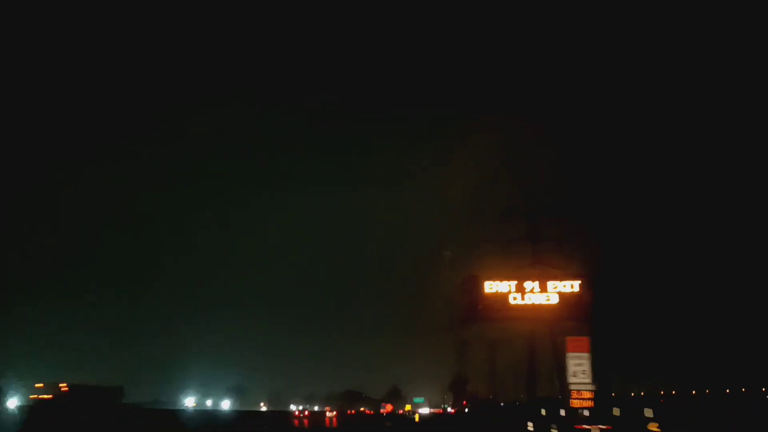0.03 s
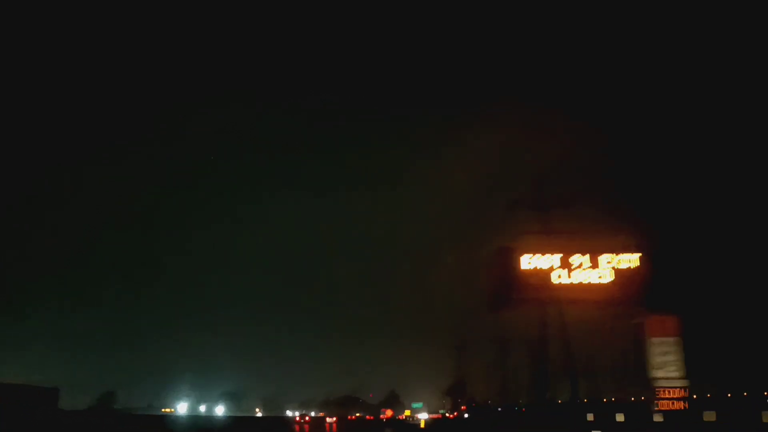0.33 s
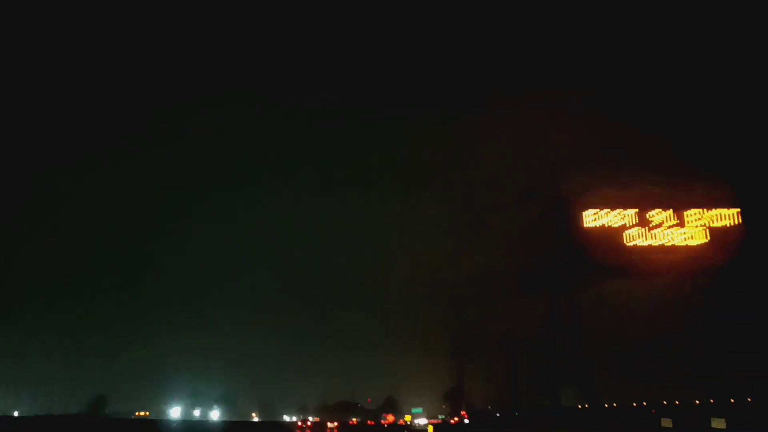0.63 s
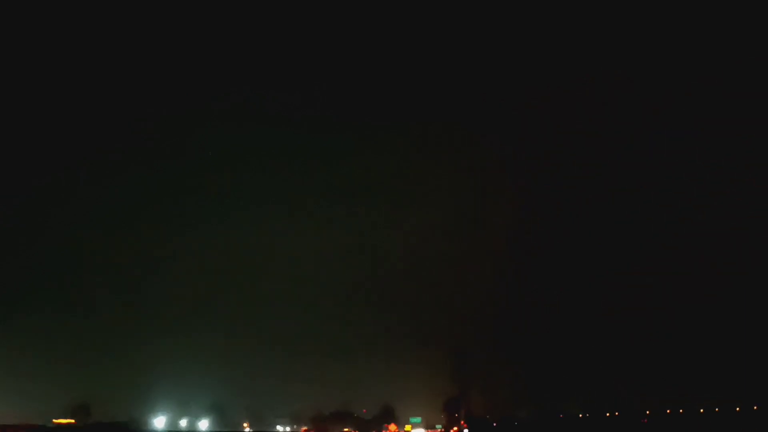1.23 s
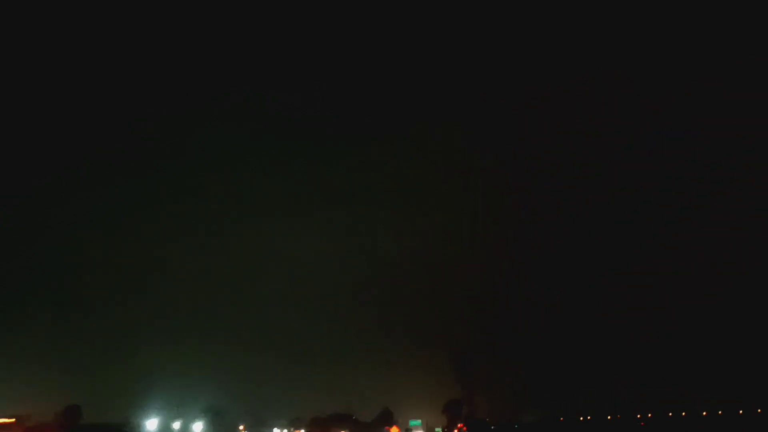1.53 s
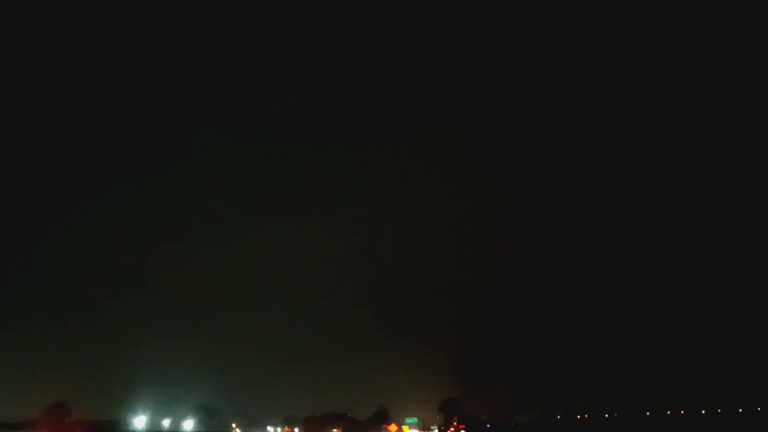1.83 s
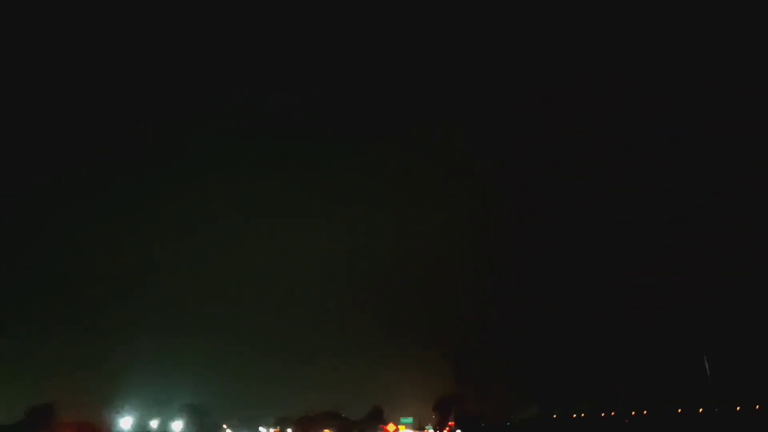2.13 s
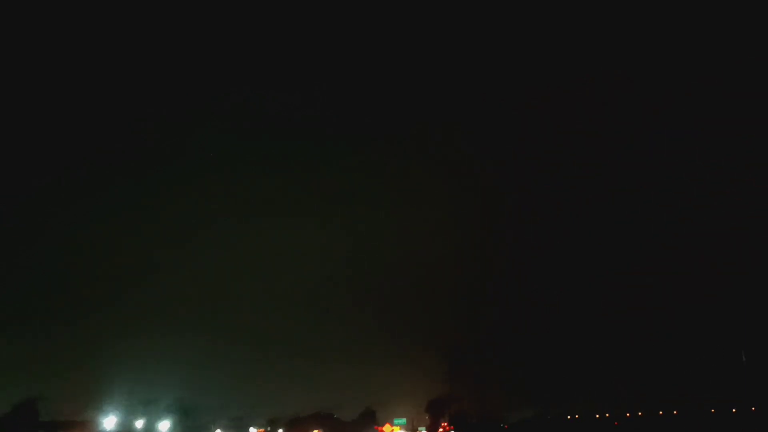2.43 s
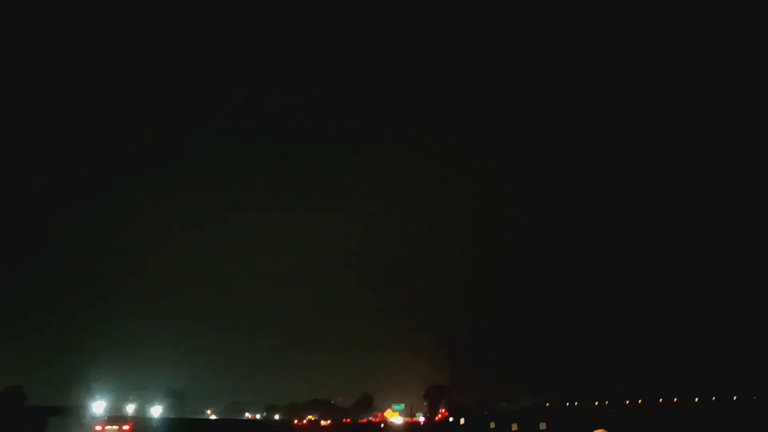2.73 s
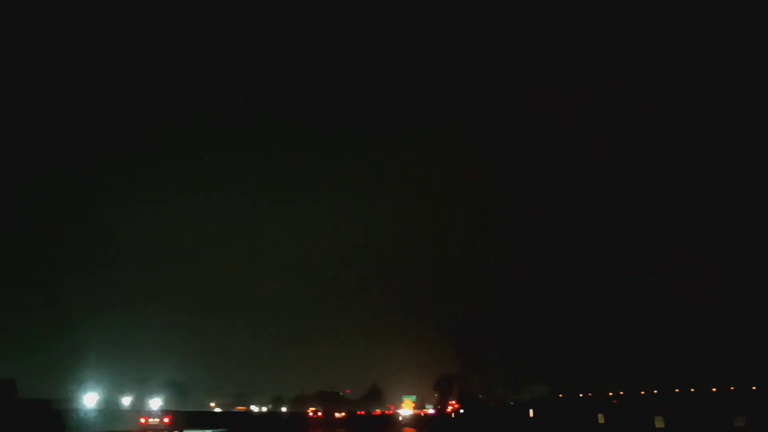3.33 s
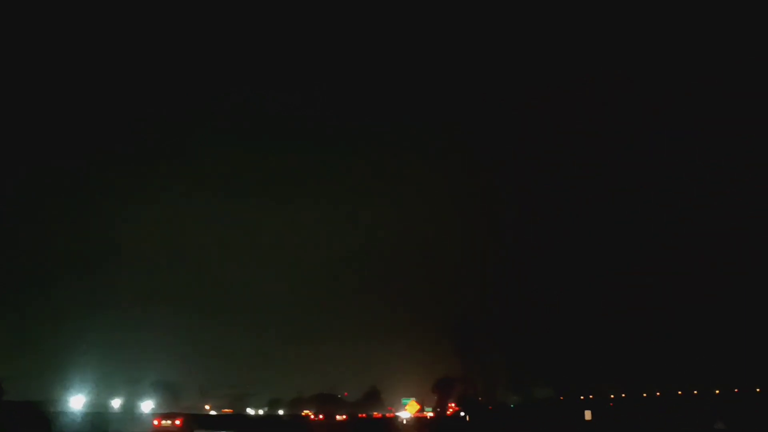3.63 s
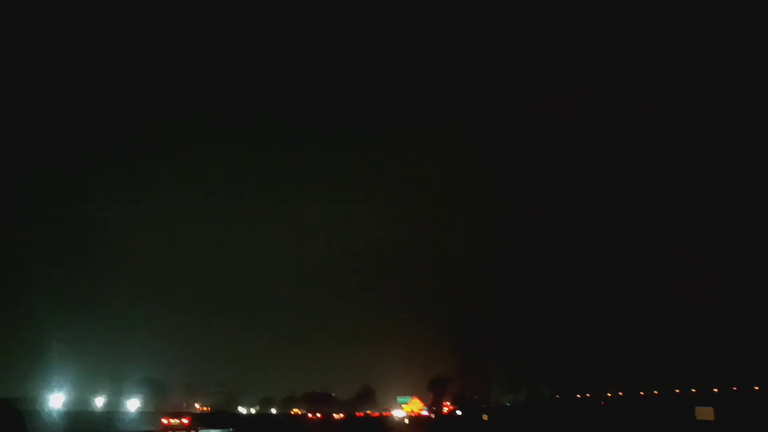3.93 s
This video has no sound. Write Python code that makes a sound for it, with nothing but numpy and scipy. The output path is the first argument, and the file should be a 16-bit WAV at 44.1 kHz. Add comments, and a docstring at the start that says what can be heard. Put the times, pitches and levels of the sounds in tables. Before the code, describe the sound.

Steady road rumble and tyre roar inside a car driving along a highway.

```python
"""Night highway, inside the car

The road rumbles through the body, the tyres roar, the engine hums and air rushes and hisses past.
Halfway the wheels knock over a joint onto other paving, where the roar is softer, the hiss brighter
and a thin whine grows. The left microphone port takes the cabin noise much louder than the right."""
import sys
import numpy as np
from scipy.fft import rfft, irfft, next_fast_len
from scipy.io import wavfile
from scipy.ndimage import map_coordinates

SR = 44100
rng = np.random.default_rng(int(sys.argv[2]) if len(sys.argv) > 2 else 0)


def wav_record(signal):
    """Record a signal, one row per channel, as 16-bit PCM in the file named by sys.argv[1]."""
    frames = np.transpose(np.atleast_2d(signal))
    bounded = np.clip(frames, -1, 1)
    # unit amplitude maps onto the largest positive 16-bit level
    quanta = np.round(bounded * 32767).astype(np.int16)
    wavfile.write(sys.argv[1], SR, quanta)


N = 176400


def road_rumble(level_db=-20):
    """The uneven road shakes the body and booms in the cabin."""
    # The colour of the boom. Each row: frequency in Hz, relative level in dB.
    spectrum = [(13, -48), (22, -28), (57, -1), (83, -1), (107, 1), (194, 1.5), (238, -3.5), (300, -12),
                (390, -33), (660, -120)]
    return amp(level_db) * rush(spectrum)


def tyre_roar(before_db=-21, after_db=-22.5, grain_db=1.0):
    """The tyres' roar takes the colour of the paving and flutters with its grain."""
    # The roar on the first and second paving. Each row: frequency in Hz, relative level in dB.
    first_spectrum = [(150, -35), (260, -1.5), (363, -3), (466, -6), (614, -4.5), (910, -5), (1110, -6),
                      (1480, -5), (1690, -11), (2690, -21), (4500, -38), (5850, -54), (9900, -120)]
    second_spectrum = [(150, -52), (260, -1.5), (370, -5), (420, -5), (500, -6.5), (650, -7.5), (850, -7),
                       (1100, -8), (1360, -8), (1650, -11), (2300, -18.5), (2900, -22.5), (4500, -38.5),
                       (5850, -53), (9900, -120)]
    blend = paving_blend()
    before = np.sqrt(1 - blend) * amp(before_db) * rush(first_spectrum)
    after = np.sqrt(blend) * amp(after_db) * rush(second_spectrum)
    return (before + after) * amp(grain_db * wobble(40.07))


def cabin_resonances(tread_above_hz=900, waver_db=2.0):
    """Road and tread noise ring the cabin in narrow bands, whose levels change with the paving."""
    # The bands. Each row: centre in Hz, half-width in Hz, gain in dB before the joint, and after it.
    bands = [(110.6, 11.6, -33, -32), (201.3, 18.7, -31, -31.5), (353.4, 30, -34, -42),
             (455, 21, -40.5, -43), (977, 24, -38, -39), (1278, 32, -37.5, -51), (1462, 41, -36, -42),
             (1541, 44, -36.5, -40), (1854, 21, -40, -44)]
    # The swells of the tread noise in the upper bands. Each row: time in seconds, gain in dB.
    tread_swells = [(0, 3), (.45, 0.5), (.72, 1.5), (.92, -2), (1.3, -.5), (1.5, 3), (1.76, -2),
                    (1.96, -4.5), (2.3, 1), (2.55, 6), (2.72, 1), (3.8, 1.5), (4, -8)]
    blend, out = paving_blend(), np.zeros((2, N))
    for centre, width, before_db, after_db in bands:
        band = cabin_noise(lambda hz: peak(hz, centre, width))
        if centre > tread_above_hz:
            band *= amp(curve(tread_swells) + waver_db * wobble(13))
        out += amp(before_db + (after_db - before_db) * blend) * band
    return out


def joint_knocks(attack_s=0.0014):
    """Front and rear axle knock over the joint and briefly ring the body."""
    # The two axle hits. Each row: start in seconds, gain in dB.
    knocks = [(2.054, -6.5), (2.158, -17)]
    # The body's modes. Each row: frequency in Hz, gain in dB, seconds to die away by 60 dB.
    modes = [(62, -16, 0.23), (149, -2.5, 0.065), (554, 2.5, 0.022), (765, -1, 0.042), (1010, -1.5, 0.022),
             (1160, -12, .018)]
    out, t = np.zeros(N + SR), np.arange(SR // 2) / SR
    ring = sum(amp(db - 60 * t / t60) * np.sin(2 * np.pi * hz * t) for hz, db, t60 in modes)
    ring *= 1 - np.exp(-t / attack_s)
    for start, db in knocks:
        out[round(start * SR):][:len(t)] += amp(db) * ring
    return out[:N]


def engine_hum(firing_hz=74.5, harmonics_db=(-34, -32.5)):
    """The cruising engine hums at its firing rate and the octave above."""
    return sum(amp(db) * tone(k * firing_hz, drift=0.0031, waver_db=1.5)
               for k, db in enumerate(harmonics_db, 1))


def cavity_hum(hz=193.4, level_db=-32):
    """The air inside the tyres resonates on one drifting note."""
    return amp(level_db) * tone(hz, drift=0.0249, waver_db=1.0)


def wheel_whine(hz=462, before_db=-39.5, after_db=-35):
    """The rolling wheels give a thin whine that grows on the second paving."""
    level_db = before_db + (after_db - before_db) * paving_blend()
    return amp(level_db) * tone(hz, drift=0.00259, waver_db=1.1)


def wind_rush(level_db=-35.5):
    """Air streams past the car in a fluttering rush."""
    # The colour of the rush. Each row: frequency in Hz, relative level in dB.
    spectrum = [(900, -60), (1600, -7), (2050, 2), (2500, -3), (3000, -8.5), (4000, -21.5), (6000, -58)]
    # Level over time: slow swells, with a brief duck just after the first knock.
    # Each row: time in seconds, gain in dB.
    levels = [(0, -3), (.28, 3), (.46, 3), (.57, -1.5), (.68, 3.5), (.85, -1.5), (1.1, -2), (1.52, 1),
              (1.8, -3.5), (1.97, 1.5), (2.08, -4.5), (2.36, 2.5), (2.55, -.5), (2.7, 2.5), (2.85, 0),
              (3.02, 1.5), (3.25, 0), (3.6, 1), (4, -3)]
    return amp(level_db) * fluttering(curve(levels), flutter_db=1.54) * rush(spectrum)


def air_hiss(left_db=-45.5, right_db=-43.5, low_cut_hz=2500, flare_half_s=0.018):
    """Passing air hisses separately at each port; both sides rise and fall together."""
    # Each port's colour, with its own high resonance. Each row: frequency in Hz, relative level in dB.
    left_spectrum = [(3000, -4), (4500, 2.5), (5500, 0.5), (6900, 1.5), (8200, -1.5), (9500, -2.5),
                     (10400, 2.3), (11500, -5.5), (13000, -13.5), (15500, -23)]
    right_spectrum = [(3000, -26), (4000, -12), (6700, -4.5), (8100, -8.5), (9300, 2), (9800, 3.5),
                      (11000, -8), (12500, -14.5), (15500, -22)]
    # Level over time: slow swells, with a brief duck just after the first knock.
    # Each row: time in seconds, gain in dB.
    levels = [(0, 0), (.14, -2.2), (.22, 0.5), (.45, .8), (.58, -.5), (.8, 0.9), (.95, -1.7), (1.05, -1),
              (1.17, -3), (1.3, -3.5), (1.46, -2), (1.7, -2.5), (1.8, -3.5), (1.93, -2.7), (2.07, -4),
              (2.14, 1.7), (2.28, -.4), (2.4, 1.3), (2.68, 2), (2.88, -0.5), (3.02, 1.5), (3.5, 1.5),
              (3.72, 2.8), (4, .5)]
    # The brief flares. Each row: time of the peak in seconds, boost in dB.
    flares = [(.74, 2), (1.535, 2), (2.175, 1), (3.195, 1.5)]

    def port(spectrum):
        colour = lambda hz: amp(along(spectrum, hz)) * hz ** 4 / (hz ** 4 + low_cut_hz ** 4)
        return unit(filtered(rng.standard_normal(N), colour))

    t = np.arange(N) / SR
    flare_db = sum(db * np.exp(-((t - at) / flare_half_s) ** 2) for at, db in flares)
    gain = fluttering(curve(levels) + flare_db, flutter_db=0.98)
    return gain * np.array([amp(left_db) * port(left_spectrum), amp(right_db) * port(right_spectrum)])


def cabin_colour(x):
    """The cabin's resonances lift some bands and its dead spots hollow out others."""
    # The peaks and dips. Each row: centre in Hz, half-width in Hz, boost or cut in dB.
    bands = [(545, 14, 1), (596, 16, -1), (725, 13, -3.5), (936, 22, -4.5), (1306, 22, 1.5),
             (1378, 23, -1.5), (1775, 39, -2), (1936, 24, 3), (2090, 27, -1), (2245, 29, 3),
             (2400, 32, -2.5), (2420, 28, 3), (2900, 35, 4), (2940, 25, -3)]
    return filtered(x, lambda hz: amp(sum(db * peak(hz, centre, width) for centre, width, db in bands)))


def right_port(x):
    """Cabin sound reaches the right port earlier and much weaker than the left."""
    # The drop on the right. Each row: frequency in Hz, loss in dB.
    loss = [(30, 13), (120, 13.8), (300, 12.3), (600, 14), (1400, 14), (2000, 9.7), (2900, 15.5),
            (4500, 8.4)]
    # Its head start. Each row: frequency in Hz, phase lead in radians.
    lead = [(50, .15), (220, 1.08), (520, 1.53), (750, 2.7), (1100, 4.07), (1600, 4.97), (2500, 4.9),
            (4500, 9.1)]
    return filtered(x, lambda hz: amp(-along(loss, hz)) * np.exp(1j * along(lead, hz)))


def cabin_noise(colour):
    """Stereo noise of rms 1 shaped by colour(hz): alike at both ports in the bass, diffuse higher up."""
    # How alike the ports sound. Each row: frequency in Hz, correlation from 0 to 1.
    likeness = [(25, 0.87), (60, 0.95), (210, 0.93), (300, 0.73), (420, 0.58), (900, 0.61), (1600, 0.68),
                (2300, 0.49), (4500, .25)]

    def mid_side_gains(hz):
        spread = np.arccos(along(likeness, hz)) / 2
        return colour(hz) * [np.cos(spread), np.sin(spread)]

    mid, side = filtered(rng.standard_normal((2, N)), mid_side_gains)
    return unit(np.array([mid + side, mid - side]))


def rush(spectrum):
    """Cabin noise with a (Hz, dB) spectrum."""
    return cabin_noise(lambda hz: amp(along(spectrum, hz)))


def paving_blend(joint_s=2.055, crossfade_s=0.029):
    """Share of the second paving under the tyres, 0 to 1."""
    return np.clip((np.arange(N) / SR - joint_s) / crossfade_s + .5, 0, 1)


def fluttering(level_db, flutter_db):
    """Gain that follows a level curve with a fast flutter on top."""
    return amp(level_db + flutter_db * wobble(45))


def tone(hz, drift, waver_db):
    """A wavering sine of rms 1; drift is its pitch wander as a fraction of hz."""
    phase = 2 * np.pi * np.cumsum(hz * (1 + drift * wobble(2.95))) / SR
    return unit(np.sin(phase + rng.uniform(0, 2 * np.pi)) * amp(waver_db * wobble(6)))


def wobble(rate):
    """A smooth random curve, rate knots a second."""
    knots = rng.standard_normal(int(N * rate / SR) + 4)
    return map_coordinates(knots, [np.arange(N) * rate / SR])


def filtered(x, response):
    """x through a filter whose complex gain is response(hz)."""
    size = next_fast_len(N + SR // 2)
    return irfft(rfft(x, size) * response(np.fft.rfftfreq(size, 1 / SR)), size)[..., :N]


def peak(hz, centre, half_width):
    """A resonance bell of height 1."""
    return 1 / (1 + ((hz - centre) / half_width) ** 2)


def along(points, hz):
    """(Hz, value) points read on a log axis."""
    freqs, values = np.transpose(points)
    return np.interp(np.log(hz + 1), np.log(freqs + 1), values)


def curve(points):
    """(s, value) points read at every sample."""
    return np.interp(np.arange(N) / SR, *np.transpose(points))


def amp(db):
    """Decibels to gain."""
    return 10 ** (np.asarray(db) / 20)


def unit(x):
    """Scaled to rms 1."""
    return x / np.sqrt(np.mean(x ** 2) + 1e-20)


def scene():
    """Road, tyres, engine and wind fill the cabin, heavy on the left; the hiss sits on top."""
    wind = wind_rush()
    noise_bed = road_rumble() + cabin_colour(tyre_roar() + wind) + cabin_resonances()
    drone = engine_hum() + cavity_hum() + wheel_whine()
    left, right = noise_bed + drone + joint_knocks()
    return np.array([left, right_port(right)]) + air_hiss()


def record(dry, top_hz=15750):
    """A hard high cut takes off the very top."""
    return filtered(dry, lambda hz: hz < top_hz)


dry = scene()
out = record(dry)
wav_record(out)
```